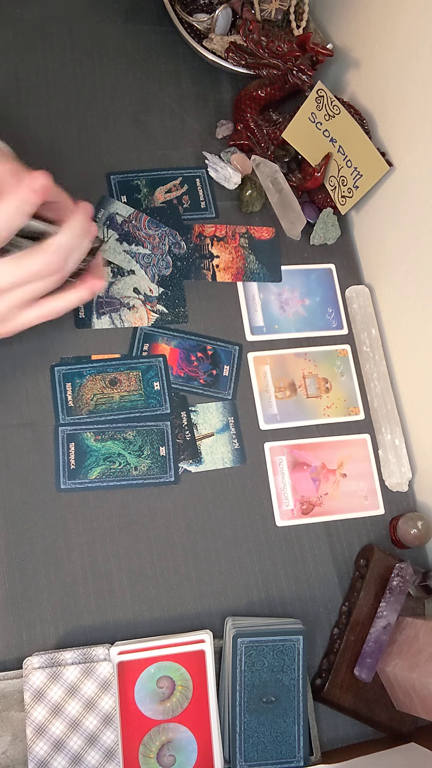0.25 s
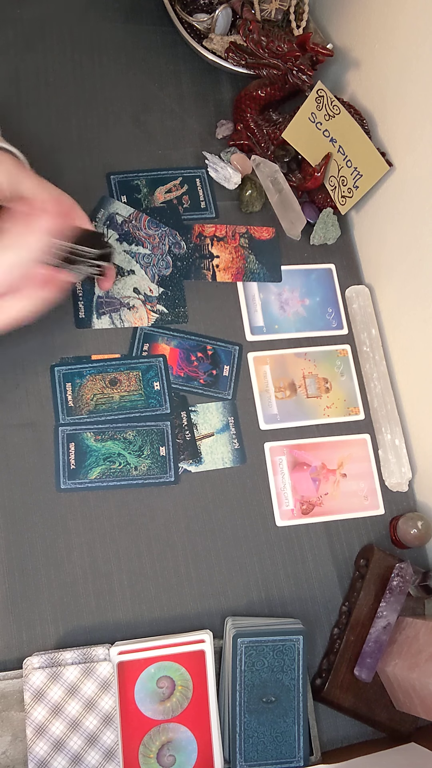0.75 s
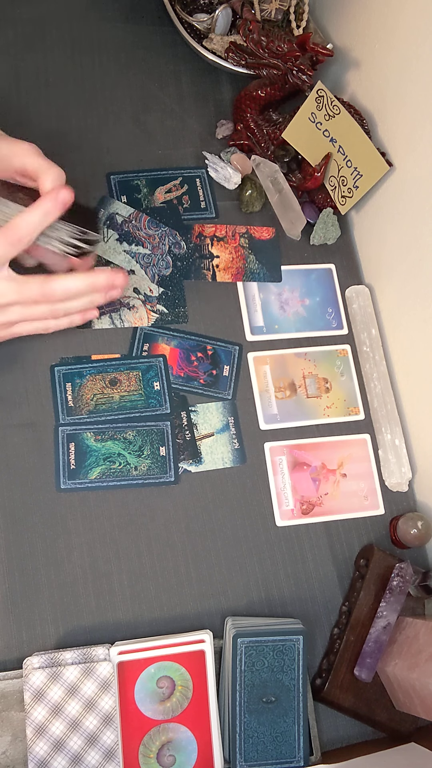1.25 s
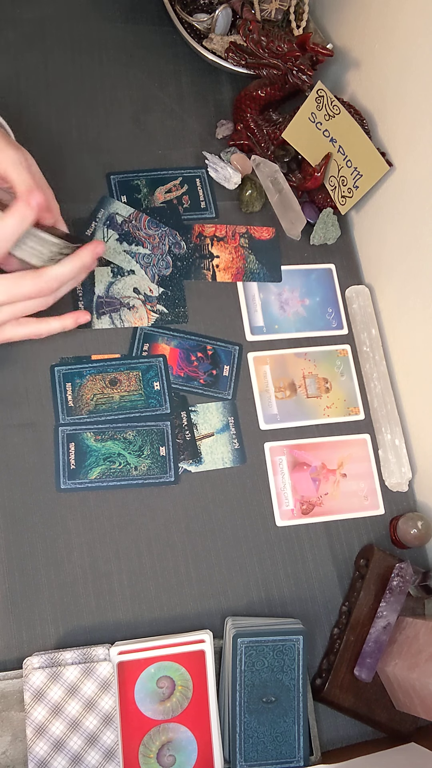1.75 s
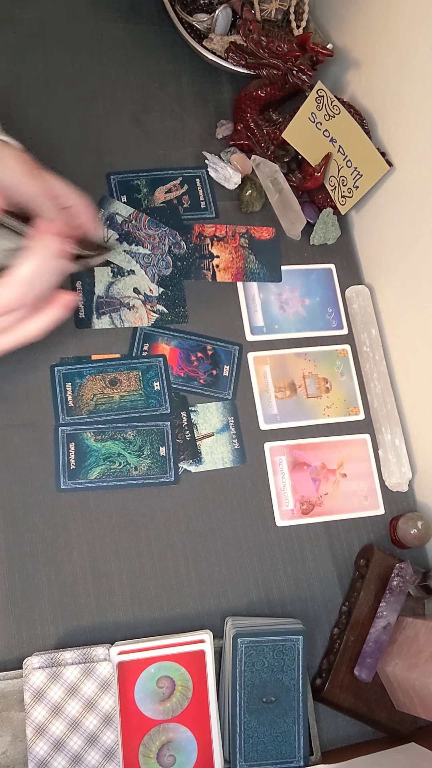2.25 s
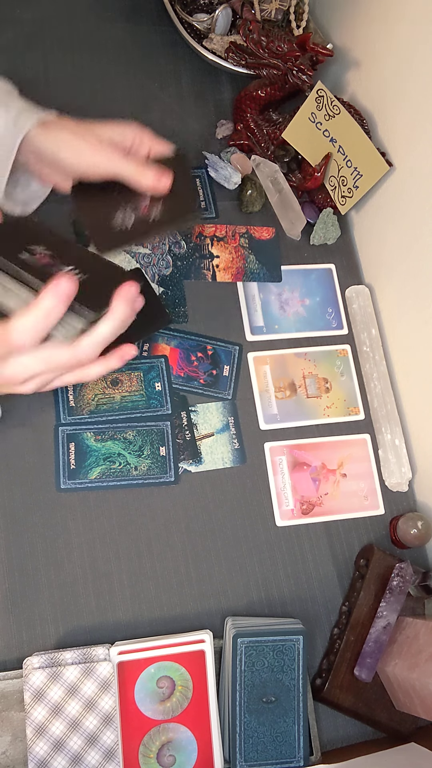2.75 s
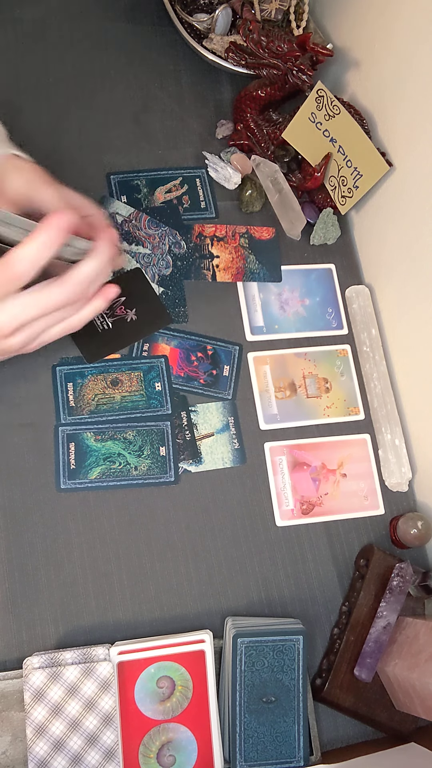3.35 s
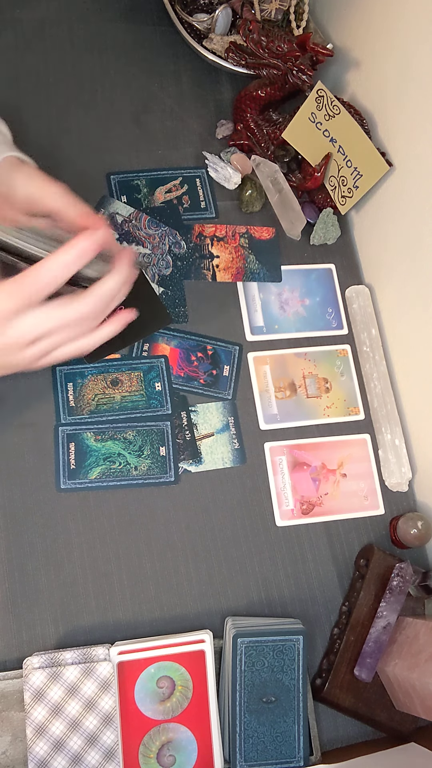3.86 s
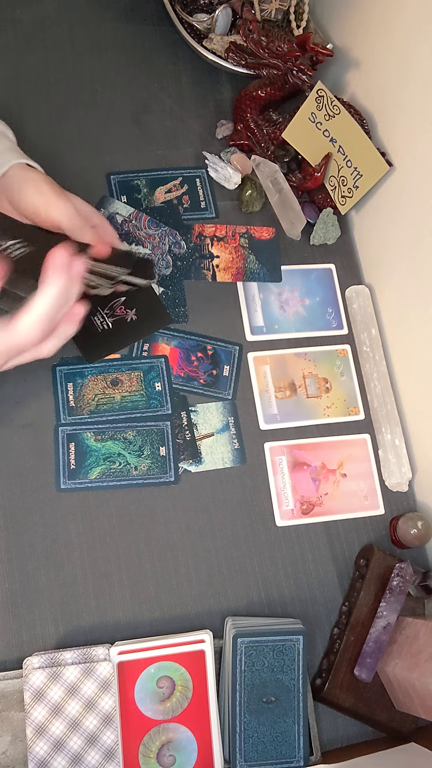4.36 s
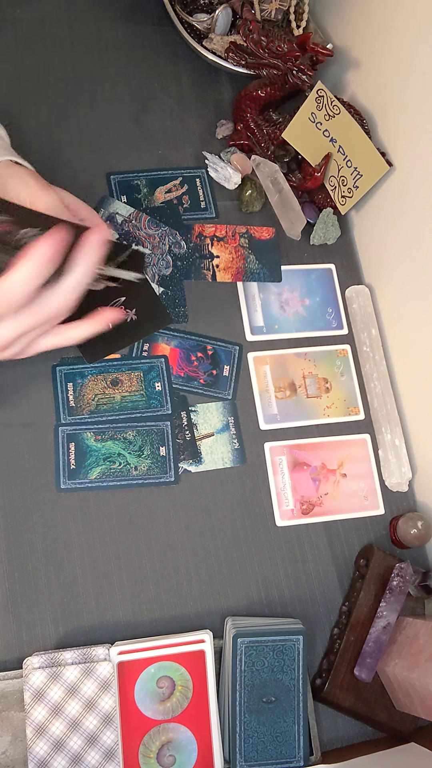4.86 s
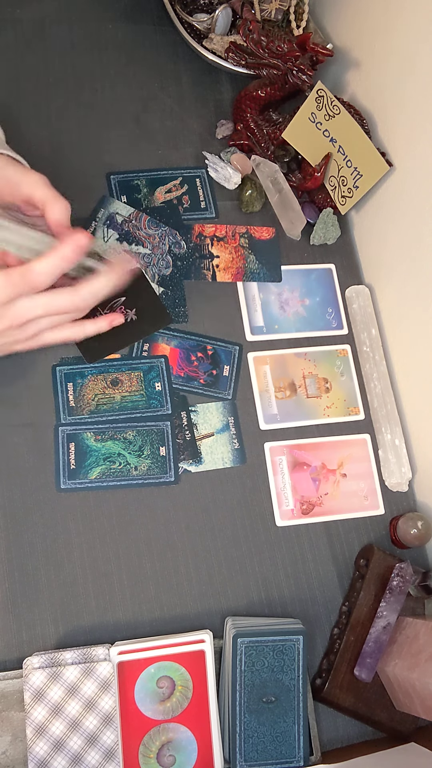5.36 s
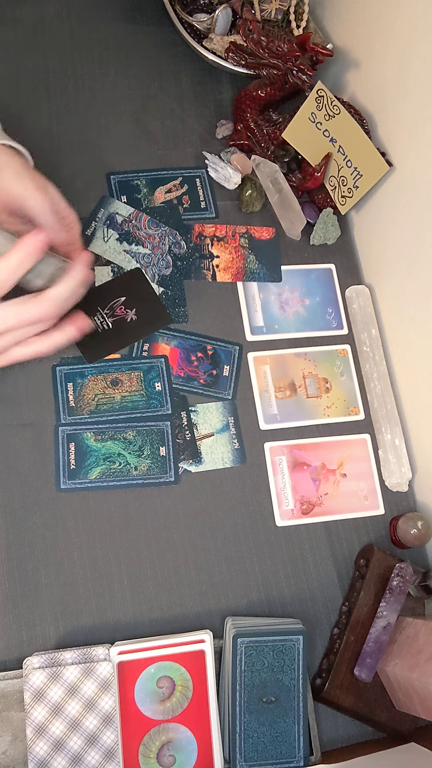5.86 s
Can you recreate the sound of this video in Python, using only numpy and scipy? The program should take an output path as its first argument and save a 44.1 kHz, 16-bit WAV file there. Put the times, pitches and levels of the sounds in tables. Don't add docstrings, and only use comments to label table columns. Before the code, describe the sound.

Stiff cards are shuffled overhand in uneven clicks, papery scrapes and soft thumps, with two hard snaps midway, over a quiet room hum.

```python
import sys
import numpy as np
from scipy import signal
from scipy.fft import rfft, irfft
from scipy.io import wavfile
from scipy.ndimage import uniform_filter1d

SR = 44100
rng = np.random.default_rng(int(sys.argv[2]) if len(sys.argv) > 2 else 0)


def persist_wave(psi):
    counts = np.round(np.clip(psi, -1, 1) * 32767).astype(np.int16)
    wavfile.write(sys.argv[1], SR, np.atleast_2d(counts).T)


def amplitude_ratio(level_db):
    exponent = np.asarray(level_db, float) / 20
    return 10 ** exponent


N = 269010
HZ = np.fft.rfftfreq(N, 1 / SR)


def curve_db(hz, table):
    f, db = np.transpose(table)
    return np.interp(np.log(hz + 1), np.log(f), db)


def shaped(x, gain):
    return irfft(rfft(x) * gain, x.shape[-1])


def band(hz, lo_hz, hi_hz):
    return 1 / np.sqrt((1 + (lo_hz / (hz + 1)) ** 8) * (1 + (hz / hi_hz) ** 8))


def ring(hz, centre_hz, width_hz):
    return 1j * hz * width_hz / (centre_hz ** 2 - hz ** 2 + 1j * hz * width_hz)


def unit(x):
    return x / np.sqrt(np.mean(x ** 2))


def walk(rate, size):
    k = int(SR / rate)
    steps = rng.standard_normal(size[:-1] + (size[-1] // k + 1,))
    return 1.1 * uniform_filter1d(np.repeat(steps, k, -1), k)[..., :size[-1]]


def grit(size, spread_db):
    return rng.standard_normal(size) * amplitude_ratio(spread_db * rng.exponential(size=size))


def to_ports(x, spread_ms, direct):
    decay = np.exp(-np.arange(256) / SR * 1e3 / spread_ms)
    paths = rng.standard_normal(x.shape[:-1] + (2, 256)) * decay
    scatter = rfft(paths, x.shape[-1])
    scatter = scatter / np.abs(scatter) ** 0.7
    scatter = scatter / np.sqrt(np.mean(np.abs(scatter) ** 2, -1, keepdims=True))
    return irfft(rfft(x)[..., None, :] * (direct + scatter), x.shape[-1])


def bursts(t60, rise_share, size, flutter_db, spread_db):
    t = np.arange(size) / SR / np.clip(t60, 0.008, 0.15)[:, None]
    shape = (1 - np.exp(-(t / rise_share) ** 2)) * np.exp(-np.log(1000) * t)
    flutter = amplitude_ratio(flutter_db * walk(500, (len(t60), size)))
    return shape * flutter * grit((len(t60), size), spread_db)


def place(times, sounds, peak_db):
    sounds = sounds[..., :sounds.shape[-1] // 2]
    out = np.zeros((2, N + sounds.shape[-1]))
    top = np.sqrt(2 * uniform_filter1d(np.mean(sounds ** 2, 1), 40).max(-1))
    for s, x, g in zip(times, sounds, amplitude_ratio(peak_db) / top):
        out[:, int(s * SR):int(s * SR) + x.shape[-1]] += g * x
    return out[:, :N]


# frequency_hz, density_db
HUSH = [(15, -30), (25, -15), (74, 5.5), (134, -7.5), (196, -6), (386, -29.5), (479, -11.5), (645, -41),
        (1340, -20.5), (1580, -34), (2370, -32.5), (7000, -23), (10500, -26.5), (13800, -24),
        (15600, -25.5), (16200, -35)]
# time_s, level_db
RUMBLE = [(0.0, -65.5), (3.019, -75.5), (6.1, -73.5)]
# pitch_hz, width_hz, level_db
DUCT = [(341.6, 11, -85), (470, 30, -87)]


def hush():
    hiss_db, hum_hz = -69.5, 62.9
    air = shaped(rng.standard_normal((2, N)), amplitude_ratio(curve_db(HZ, HUSH)) * band(HZ, 32, 16200))
    hum = unit(shaped(rng.standard_normal((2, N)), ring(HZ, hum_hz, 1.6)))
    low = unit(shaped(air, band(HZ, 38, 220))) + 0.88 * hum
    rumble_db = np.interp(np.arange(N) / SR, *np.transpose(RUMBLE)) + 1.3 * walk(7.0, (N,))
    out = unit(shaped(air, band(HZ, 130, 16200))) * amplitude_ratio(hiss_db - 4) + low * amplitude_ratio(rumble_db + 3.5)
    for pitch_hz, width_hz, db in DUCT:
        tone = unit(shaped(rng.standard_normal((2, N)), ring(HZ, pitch_hz, width_hz) ** 2))
        out += amplitude_ratio(db) * tone * amplitude_ratio(3.0 * walk(3, (N,)))
    return out


# start_s, length_s, level_db, pitch_hz
SQUEAKS = [
    (0.225, 0.045, -66, 1780),
    (0.257, 0.03, -66, 2000),
    (0.265, 0.068, -66, 2300),
    (0.268, 0.048, -65, 1790),
    (2.073, 0.051, -61, 1710),
    (2.795, 0.024, -68.5, 3120),
    (2.812, 0.022, -66.5, 2160),
]
# start_s, length_s, level_db, pitch_hz
SCUFFS = [(0.651, .04, -57, 2500), (0.926, .025, -57, 2100), (0.956, .045, -59, 4700),
          (1.981, .03, -73, 1130), (2.379, 0.025, -46, 640), (2.425, .035, -48, 930),
          (3.386, .025, -47, 2400), (3.506, .03, -50, 2750), (3.812, .045, -59, 3280),
          (4.085, 0.065, -62, 2800), (4.371, 0.032, -56, 1850), (4.376, 0.06, -62, 1150)]
# start_s, length_s, level_db, pitch_hz
WIPES = [(0.612, .04, -43, 14500), (0.895, 0.18, -57, 13300), (1.46, 0.11, -59, 4400),
         (2.3, .035, -47, 13500), (2.37, 0.018, -37, 13500), (2.54, 0.064, -44, 13500),
         (3.085, .028, -43, 13000), (3.15, 0.067, -49, 13300), (3.213, 0.022, -43, 13800),
         (3.215, 0.023, -42.5, 4520), (3.495, 0.037, -45, 3000), (3.466, .02, -46.5, 13500),
         (3.812, 0.031, -39, 13800), (4.02, 0.055, -57, 13700), (4.888, 0.04, -52, 13060),
         (5.07, 0.04, -64, 13000), (5.125, 0.039, -44.5, 8500), (5.125, 0.039, -48, 13500),
         (5.285, 0.03, -64.5, 6490), (5.396, 0.041, -45.5, 5870), (5.6, 0.082, -63, 12780)]


def squeaks():
    out = np.zeros((2, N))
    hz = np.fft.rfftfreq(8192, 1 / SR)
    for table, width in ((SQUEAKS, 0.085), (SCUFFS, 0.36), (WIPES, 0.65)):
        for s, length, db, pitch_hz in table:
            a, n = int(s * SR), int(length * SR)
            mode = ring(hz, pitch_hz, width * min(pitch_hz, 8000))
            rub = unit(shaped(grit((2, 8192), 1.5), mode ** 2))
            out[:, a:a + n] += amplitude_ratio(db) * np.sin(np.pi * np.arange(n) / n) * rub[:, :n]
    return out


# start_s, peak_db, pitch_hz, t60_s
KNOCKS = [(0.096, -38.5, 680, 0.025), (0.617, -36, 2670, .012), (0.623, -39, 4720, .012),
          (0.7198, -33.5, 464, 0.048), (0.945, -50, 2450, .015), (1.022, -42, 4630, 0.011),
          (2.4976, -17, 2090, 0.022), (2.4978, -23, 3660, .01), (2.5166, -20.5, 605, 0.037),
          (2.5245, -20, 3430, .035), (2.529, -20, 2040, .03), (2.7585, -32.5, 2220, 0.028),
          (2.835, -57, 2290, .035), (3.3607, -16.5, 2530, 0.024), (3.361, -9.5, 5080, 0.011),
          (3.3615, -39, 610, 0.019), (3.369, -22.5, 2510, .02), (3.3754, -17, 2427, 0.02),
          (3.3756, -13.5, 4370, .008), (3.4342, -39, 560, .025), (4.369, -27.5, 1130, 0.018),
          (4.369, -32, 449, 0.043), (4.3743, -31, 800, .015), (4.8338, -43, 3180, .015),
          (4.848, -41, 253, 0.038), (4.878, -42, 705, 0.018)]


def knocks(size=8192):
    s, db, mode_hz, t60 = np.transpose(KNOCKS)[:, :, None]
    hz = np.fft.rfftfreq(size, 1 / SR)
    width_hz = np.log(1000) / np.pi / np.clip(t60, 0.004, 0.2)
    blow = irfft(ring(hz, mode_hz, width_hz) / (1 + 1j * hz / mode_hz) ** 2, size)
    straight = 1.5 / (1 + (hz / 800) ** 2)
    return place(s[:, 0], to_ports(blow, 0.25, straight), db[:, 0])


# start_s, peak_db, hollow_hz, t60_s
FLEXES = [(0.069, -33, 300, 0.085), (0.067, -44, 1250, 0.029), (0.095, -34.5, 664, 0.028),
          (0.346, -31, 376, 0.15), (0.617, -38.5, 505, 0.081), (0.898, -47.5, 265, 0.081),
          (0.925, -46.5, 223, 0.071), (1.207, -34.5, 657, 0.085), (1.224, -32.5, 366, 0.074),
          (1.496, -55, 1160, 0.14), (2.257, -38.5, 470, 0.057), (2.284, -39.5, 630, 0.07),
          (2.499, -26.5, 660, 0.034), (2.5, -21.5, 1196, 0.086), (2.512, -21.5, 580, 0.1),
          (2.526, -22, 1010, 0.057), (2.553, -34.5, 599, 0.03), (2.587, -41.5, 615, 0.04),
          (3.068, -42, 506, 0.086), (3.094, -40, 217, 0.068), (3.16, -48.5, 606, 0.035),
          (3.368, -30.5, 1030, 0.075), (3.665, -36, 420, 0.08), (3.94, -46, 655, 0.2),
          (4.251, -44, 504, 0.079), (4.256, -37.5, 1097, 0.029), (4.528, -34.5, 1137, 0.05),
          (4.826, -48.5, 548, .04), (4.876, -42, 990, 0.036), (4.531, -37, 342, 0.1),
          (4.575, -37.5, 233, 0.057), (4.841, -39, 660, 0.067), (4.878, -42, 473, 0.091),
          (5.129, -41, 658, 0.029)]
# start_s, peak_db, hollow_hz, t60_s
DROPS = [(0.177, -34, 304, 0.038), (0.174, -34.5, 1180, 0.037), (0.463, -36.5, 1900, 0.078),
         (0.718, -39.5, 1320, 0.035), (0.461, -32, 496, 0.042), (0.721, -32, 229, 0.065),
         (0.719, -38, 464, 0.035), (1.026, -38, 340, 0.059), (2.072, -42, 1170, 0.03),
         (2.382, -34.5, 630, 0.076), (2.427, -33, 930, 0.063), (2.434, -46.5, 367, 0.16),
         (2.692, -36, 405, 0.061), (2.692, -35.5, 1503, 0.037), (4.65, -43.5, 1207, 0.053),
         (2.758, -41, 677, 0.068), (2.993, -52.5, 286.5, 0.16), (3.23, -42, 1180, 0.09),
         (3.432, -45.5, 500, 0.033), (3.484, -41.5, 228, 0.06), (3.503, -36.5, 427, 0.071),
         (3.828, -57, 743, 0.11), (4.068, -47, 439, 0.05), (4.369, -33, 365, 0.17),
         (4.364, -35, 1140, 0.09), (4.649, -45, 440, 0.081), (4.901, -39.5, 355.7, 0.039),
         (5.991, -43, 352, 0.06)]


def thumps(size=8192):
    s, db, hollow_hz, t60 = np.transpose(FLEXES + DROPS)
    hz = np.fft.rfftfreq(size, 1 / SR)
    push = bursts(0.79 * t60, 0.061, size, flutter_db=1.0, spread_db=2.0)
    hollow = hollow_hz[:, None]
    body = band(hz, 90 + 0.077 * hollow, 1700) * (0.2 + ring(hz, hollow, 0.2 * hollow))
    straight = 1.9 / (1 + (hz / 800) ** 2)
    return place(s - 0.002, to_ports(shaped(push, body), 0.28, straight), db - 3.0)


# peak_s, hiss_db, treble_db
BRUSHES = [(0.903, -60, 3), (1.455, -68, 2), (1.515, -61.5, 8), (1.6, -76, 14), (1.654, -74, 12.5),
           (1.765, -79, 15), (1.869, -79, 14.5), (1.998, -62.5, 7), (5.09, -73, 6), (5.305, -74, 1.5),
           (5.375, -65.5, 2), (5.419, -58.5, 8), (5.482, -68, 15), (5.59, -73.5, 9), (5.76, -73, 16.5),
           (5.93, -61, 10)]
# start_s, length_s, hiss_db, treble_db
GLIDES = [(0.105, 0.055, -59.5, 5), (0.204, 0.17, -69, -21), (0.386, 0.046, -55.5, 4.5),
          (0.611, 0.098, -52, 1), (0.904, 0.015, -52, 5.5), (0.927, 0.088, -62, 11),
          (1.285, 0.017, -62, 1.5), (2.258, 0.13, -50, 3), (2.489, .008, -41, -11),
          (2.497, 0.037, -33, -12), (2.545, 0.053, -50, 7.5), (2.613, 0.24, -67, -15),
          (3.081, 0.11, -52.5, -3), (3.54, 0.045, -73, -18.5), (3.721, 0.079, -68.5, 16),
          (3.813, 0.015, -62, 19), (3.963, 0.022, -53.5, -1.5), (4.012, 0.063, -59, 8),
          (4.287, 0.11, -63, 8.5), (4.591, 0.052, -59.5, 8.5), (4.867, 0.058, -61, -4.5),
          (5.13, 0.019, -52.5, -7.5), (5.421, 0.073, -67, 11), (5.773, 0.07, -82, 2),
          (5.94, 0.029, -75, 16), (5.981, 0.014, -55, -4), (6.015, .08, -84, -1)]
# end_s, hiss_db, treble_db
SWELLS = [
    (3.227, -59, -3),
    (1.205, -72, 5),
    (1.505, -66, 0),
    (2.069, -63.5, 11),
    (3.496, -46.5, -4),
    (3.666, -69, -0.5),
    (3.943, -61, 6.5),
    (5.688, -72.5, 8),
]
# fall_db_per_s, treble_db, share of the edge treble
PULL_SCRAPE = (360, -0.45, 0.9)
# fall_db_per_s, treble_db, share of the edge treble
LANDING_SCRAPE = (780, -2, 0.51)
# start_s, peak_db, edge_treble_db, ring_hz, scrape_db
PULLS = [(0.064, -27, -5, 2630, -41.5), (0.3456, -22.5, -2.5, 4370, -41), (0.615, -34, -8, 4560, -48.5),
         (0.924, -39, -18, 2090, -51), (1.204, -27, -2, 3640, -41), (1.2243, -23.5, -3, 4130, -42.5),
         (2.2608, -38, 2, 3800, -44), (2.496, -16.5, -5, 2296, -46), (2.5225, -20, -10, 3450, -24),
         (3.0668, -33, 0.5, 4250, -43), (3.3593, -8.5, -9, 5360, -27), (3.6625, -30, -5.5, 3500, -35.5),
         (3.939, -40, -2.5, 3380, -41), (4.2542, -27.5, -3, 2860, -46), (4.5281, -26.5, 1.5, 3830, -38),
         (4.84, -30, -7, 3750, -39), (5.127, -29, 2, 4730, -50.5)]
# start_s, peak_db, edge_treble_db, ring_hz, scrape_db
LANDINGS = [(0.17, -38.5, 6.5, 1780, -44), (0.4564, -44, -4, 1820, -41.5), (0.716, -27.5, -13, 3500, -41),
            (1.0257, -33.5, -58, 3230, -40.5), (2.0677, -28, -8, 1830, -42.5), (2.389, -52, 4, 2700, -69),
            (2.4183, -48, -5, 2830, -47.5), (2.6914, -37.5, -11, 1595, -64),
            (2.7569, -32.5, -16, 2110, -37.5), (3.224, -30, -8, 4920, -39.5), (3.43, -31, -5, 2410, -53),
            (3.498, -26, -84, 2770, -33.5), (3.8352, -40.5, -3, 3360, -53.5), (4.065, -41, -25, 5100, -36),
            (4.362, -37, 0, 3550, -43), (4.651, -32, -10, 2300, -49), (4.899, -30, -13, 2520, -48),
            (5.9878, -33.5, -23, 3510, -44.5)]


def motions(t):
    glide_fade, release, swell_rise = 49, 601, 191.5
    lead_db, lead_share, lead_rise = -47.5, 0.23, 1498.5
    rustle_db, rustle_treble_db = -77.5, -3
    brush_slope, body_fall = 464, 518.5
    body_db, glide_body_db = -11.5, -6.5

    def ramp(s, db, db_s, start, end):
        s, db, start, end = (np.asarray(v)[:, None] for v in (s, db, start, end))
        return np.where((t >= start) & (t < end), db + db_s * (t - s), -200)

    glide_s, glide_length, glide_db, glide_treble = np.transpose(GLIDES)
    swell_s, swell_db, swell_treble = np.transpose(SWELLS)
    brush_s, brush_db, brush_treble = np.transpose(BRUSHES)
    pulls, landings = np.transpose(PULLS), np.transpose(LANDINGS)
    pull_s, creep_db = pulls[0], lead_share * pulls[4] + lead_db
    part_s = glide_s + glide_length
    steady = [ramp(glide_s, glide_db, -glide_fade, glide_s, part_s),
              ramp(swell_s, swell_db, swell_rise, swell_s - 1, swell_s),
              ramp(pull_s, creep_db, lead_rise, pull_s - 1, pull_s),
              rustle_db + 0 * t[None],
              ramp(part_s, glide_db - glide_fade * glide_length, -release, part_s, glide_s + 1),
              ramp(swell_s, swell_db, -release, swell_s, swell_s + 1),
              brush_db[:, None] - brush_slope * np.abs(t - brush_s[:, None])]
    hiss = list(steady)
    treble = [glide_treble, swell_treble, 0 * pull_s + rustle_treble_db, [rustle_treble_db],
              glide_treble, swell_treble, brush_treble]
    for events, scrape in ((pulls, PULL_SCRAPE), (landings, LANDING_SCRAPE)):
        s, _, edge_db, _, db = events
        fall, base_db, share = scrape
        hiss.append(ramp(s + 0.00062, db, -fall, s + 0.0028, s + 1))
        treble.append(base_db + share * edge_db)
    s, db, _, _ = np.transpose(FLEXES + DROPS)
    after_thump = ramp(s, db + body_db, -body_fall, s, s + 1)
    body = np.vstack([np.vstack(steady) + glide_body_db, after_thump])
    return np.vstack(hiss), np.concatenate(treble)[:, None], body


# frequency_hz, density_db
FACE = [(710, -42), (1200, -7.5), (1880, -5), (2230, -6), (3850, -7), (4150, -9.5), (4680, -8), (5950, -10),
        (7160, -8), (10900, -6.5), (13500, -1), (15200, 0), (16200, -16)]


def slide():
    t, coarse = np.arange(N) / SR, np.arange(0, N / SR, 0.001)
    hiss_db, treble_db, body_db = motions(coarse)

    def total(db):
        return np.interp(t, coarse, np.sqrt(np.sum(amplitude_ratio(2 * db), 0)))

    drag = grit((2, N), 1.6) * amplitude_ratio(1.5 * walk(400, (N,)) + 1.2 * walk(90, (N,)))
    face = amplitude_ratio(curve_db(HZ, FACE))
    layers = []
    for lo, hi, tilt in ((1900, 2900, -0.15), (2900, 5100, 0.05), (5100, 6700, 0.35)):
        level = total(hiss_db + tilt * treble_db) * amplitude_ratio(-8.5 + 1.8 * walk(35, (N,)))
        layers.append((face * band(HZ, lo, hi), level))
    layers.append((face * band(HZ, 4900, 13000), total(hiss_db + 0.9 * treble_db - 9.0)))
    level = total(hiss_db + treble_db - 2.0) * amplitude_ratio(1.4 * walk(35, (N,)))
    layers.append((face * band(HZ, 10000, 15000), level))
    level = total(body_db) * amplitude_ratio(-2.0 + 0.43 * walk(35, (N,)))
    layers.append((band(HZ, 200, 1700) * ring(HZ, 420, 1600.0), level))
    return sum(unit(shaped(drag, gain)) * uniform_filter1d(level, size=170) for gain, level in layers)


# start_s, peak_db, edge_treble_db, ring_hz
CATCHES = [(0.075, -32.5, 0, 2340), (0.093, -28.5, -12, 3540), (0.358, -30.5, -13.5, 2460),
           (0.6526, -33.5, -17, 3860), (2.285, -28.5, -14.5, 3400), (2.3241, -38, -8, 4730),
           (2.3481, -29.5, -12, 2420), (2.4867, -46, -5, 3650), (2.5092, -25.5, -27, 2300),
           (2.5301, -20.5, -15.5, 2000), (2.5874, -49, 10, 3200), (3.0646, -35, -2.5, 6100),
           (3.0927, -31.5, 0, 2620), (3.1255, -26, -20, 3500), (3.368, -15.5, -20, 2400),
           (3.376, -13.5, -20, 2420), (3.3822, -25, -18, 5070), (3.397, -29.5, -12, 5100),
           (3.476, -36, 1, 3750), (3.688, -28, -14, 2480), (4.0775, -30, -25, 3000), (4.247, -31, -4, 3500),
           (4.575, -35, -24.5, 4440), (4.583, -37.5, -5, 2650), (5.146, -44, 4, 3270)]
# start_s, peak_db, edge_treble_db, ring_hz
STRAYS = [
    (1.286, -49.5, -5, 4750),
    (1.473, -49.5, -17, 3700),
    (1.496, -46.5, -17, 4530),
    (2.784, -49.5, -9, 3200),
    (3.814, -46, 12.5, 6230),
    (5.299, -61, -11, 6570),
]
# start_s, peak_db, edge_treble_db, ring_hz
SNAPS = [(0.0662, -33, 8, 3020), (0.0952, -32, 2, 3520), (0.1738, -34.5, 3.5, 2480), (0.347, -25, -3, 3980),
         (0.4625, -33, 2, 3040), (0.7191, -31.5, -1, 3500), (1.0291, -30.5, -7, 3820),
         (1.2058, -33, 6, 3700), (1.2279, -31, 7, 4200), (2.072, -35, 1.5, 2040), (2.258, -32.5, 0, 3760),
         (2.2858, -38, -4, 3570), (2.2923, -38, -10, 3500), (2.3896, -37.5, 6, 3020),
         (2.497, -15, -3, 2600), (2.5104, -24, -1, 2385), (2.5269, -19.5, -5, 3440),
         (2.693, -35, -0.5, 2190), (2.7575, -27.5, -9, 3300), (3.0691, -24, 1, 4200),
         (3.1268, -28, -10, 3600), (3.235, -40, -10, 4000), (3.3590, -9, -16, 5340),
         (3.3747, -11.5, -10, 4500), (3.4312, -30, -6, 2490), (3.491, -38, 4, 6000),
         (3.4989, -21, -26, 2900), (3.5167, -42, -14, 2980), (3.6647, -27.5, -1.5, 3460),
         (3.6678, -26.5, -6, 3480), (3.6912, -27.5, -1, 3900), (3.9425, -33, 3, 6700),
         (4.0686, -34.5, 5.5, 4960), (4.0779, -24, -23, 2930), (4.256, -28, -1, 3200),
         (4.2896, -47.5, -3, 4000), (4.3673, -27.5, 4, 3570), (4.5295, -23, 4, 3500),
         (4.5747, -38, -11, 3500), (4.654, -36.5, -5, 2560), (4.841, -22.5, 0.5, 3600),
         (4.9001, -38.5, -7, 2700), (5.1517, -38, 4, 3300), (5.9908, -31.5, -3.5, 3500)]
TICK_T60_S = [0.067, 0.039, 0.039, 0.067, 0.014]
TICK_TRIM_DB = [-6.5, -6, -2.5, 0.5, -3.5]


def ticks(size=8192):
    kinds = PULLS, LANDINGS, CATCHES, STRAYS, SNAPS
    s, db, edge_db, ring_hz = np.transpose([row[:4] for kind in kinds for row in kind])
    t60, trim_db = np.repeat([TICK_T60_S, TICK_TRIM_DB], [len(kind) for kind in kinds], 1)
    db = db + trim_db
    hz = np.fft.rfftfreq(size, 1 / SR)
    face = amplitude_ratio(curve_db(hz, FACE))
    push = bursts(t60, 0.024, size, flutter_db=3.0, spread_db=1.8)
    mode = ring(hz, ring_hz[:, None], 0.19 * ring_hz[:, None])
    flap = face * (0.39 * band(hz, 2500, 7900) + band(hz, 1800, 7900) * mode)
    crack = face * band(hz, 4900, 20000)
    flaps = place(s, to_ports(shaped(push, flap), 0.66, 0), db - 0.6)
    return flaps + place(s, to_ports(shaped(push, crack), 0.24, 0), db + edge_db + 0.5)


def room(cards):
    level_db, t60_s = -7, 0.035
    t = np.arange(N) / SR
    tail = rng.standard_normal((2, N)) * np.exp(-np.log(1000) * t / t60_s) * (t > 0.003)
    walls = rfft(tail) / np.sqrt(np.sum(tail ** 2) / 2) / (1 + 1j * HZ / 2500)
    return shaped(cards, amplitude_ratio(level_db) * walls)


def scene():
    cards = ticks() + thumps() + slide() + knocks() + squeaks()
    return cards + room(cards) + hush()


def low_pass(x):
    return signal.sosfilt(signal.butter(12, 16980, fs=SR, output="sos"), x)


# frequency_hz, level_db
WIDTH = [(60, -17), (200, -14.5), (400, -9), (700, -8), (1300, 6.5), (1700, 3), (2400, 0.5), (4400, 1),
         (15000, 0)]
# frequency_hz, level_db
LEAN = [(60, 0.5), (110, 0.5), (200, -0.5), (380, -0.5), (700, -8.5), (1290, -2), (2380, -1.5),
        (4400, -3.5), (8120, 2.5), (15000, -3)]
PORT_ECHO = [(44, 0.037), (47, 0.0043)]
# centre_hz, width_hz, depth (0-1)
NOTCHES = [(1607, 430, 0.4), (10870, 1100, 0.4)]


def record(dry):
    mid = (dry[0] + dry[1]) / 2
    side = shaped(dry[0] - dry[1], amplitude_ratio(curve_db(HZ, WIDTH))) / 2
    lag, gain = np.transpose(PORT_ECHO)[:, :, None]
    response = amplitude_ratio(curve_db(HZ, LEAN) * np.array([[0.5], [-0.5]]))
    response = response / (1 + (HZ / 15950) ** 150)
    for centre_hz, width_hz, depth in NOTCHES:
        response = response * (1 - np.clip(depth, 0, 0.9) * ring(HZ, centre_hz, width_hz))
    echo = 1 + gain * np.exp(-2j * np.pi * HZ * lag / SR)
    mix = shaped(np.array([mid + side, mid - side]), response * echo)
    return low_pass(mix)


dry = scene()
out = record(dry)
persist_wave(out)
```